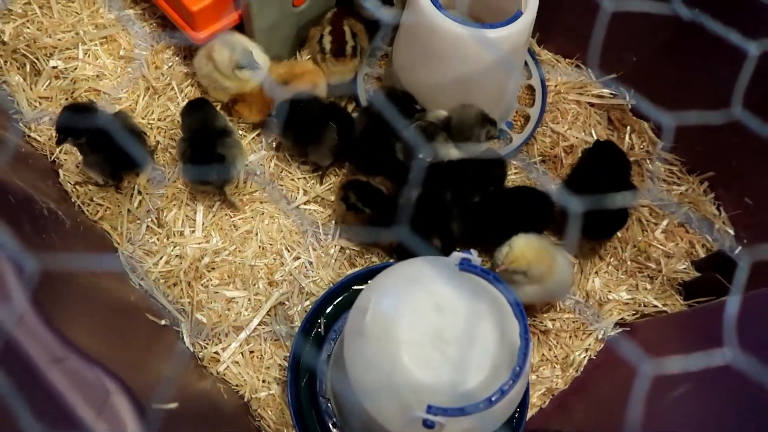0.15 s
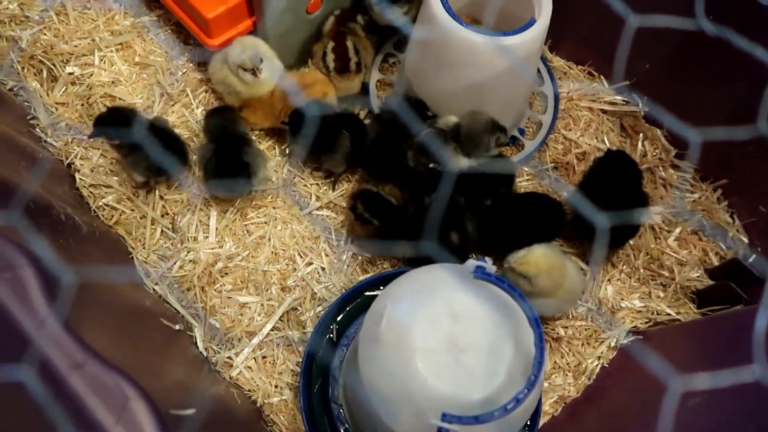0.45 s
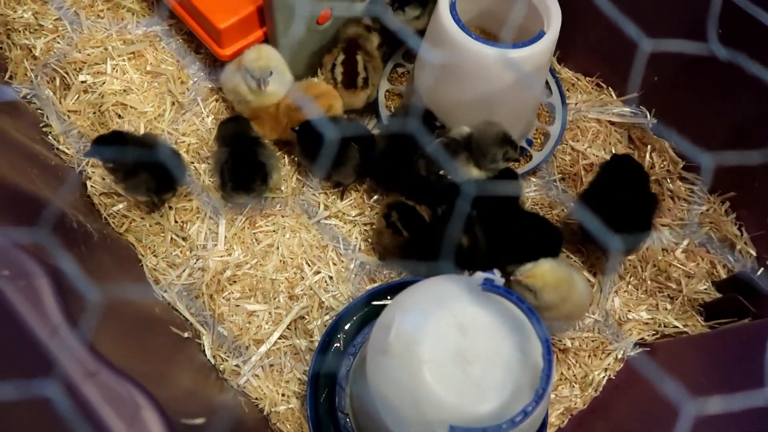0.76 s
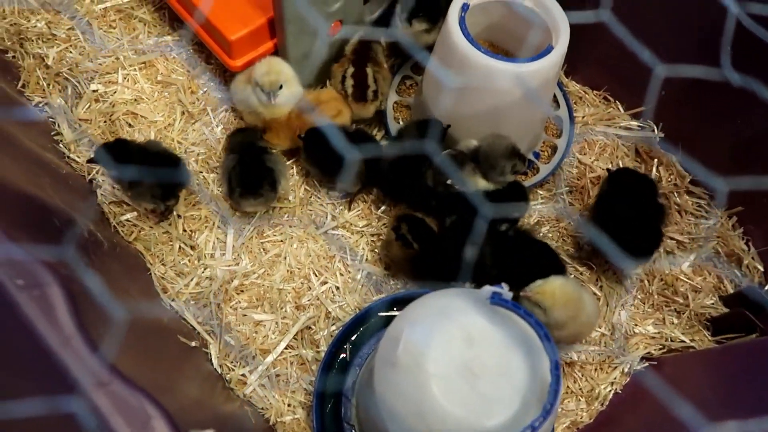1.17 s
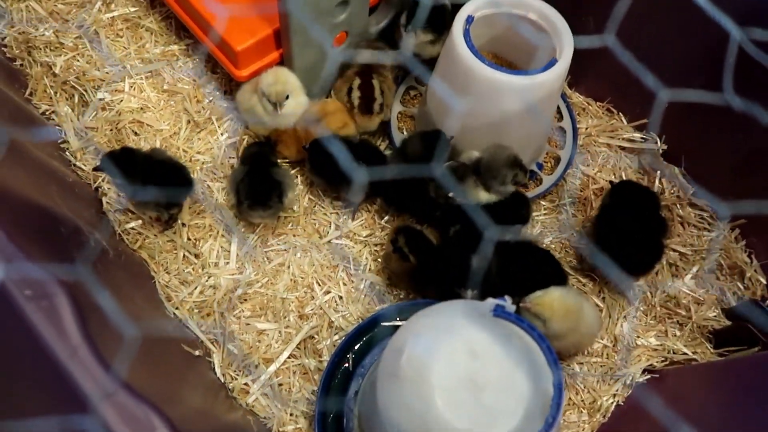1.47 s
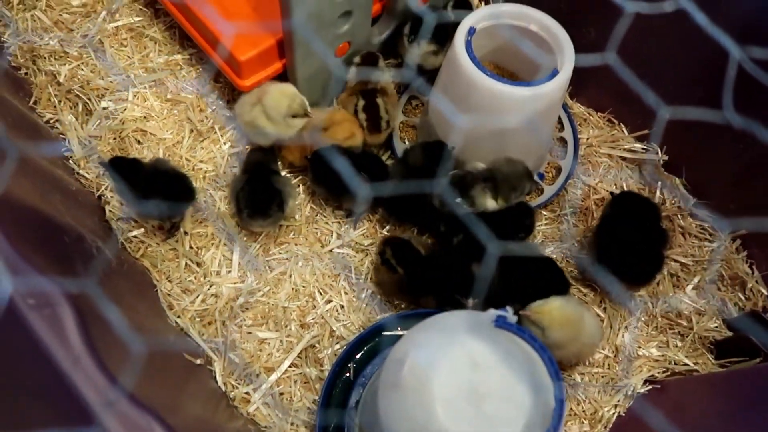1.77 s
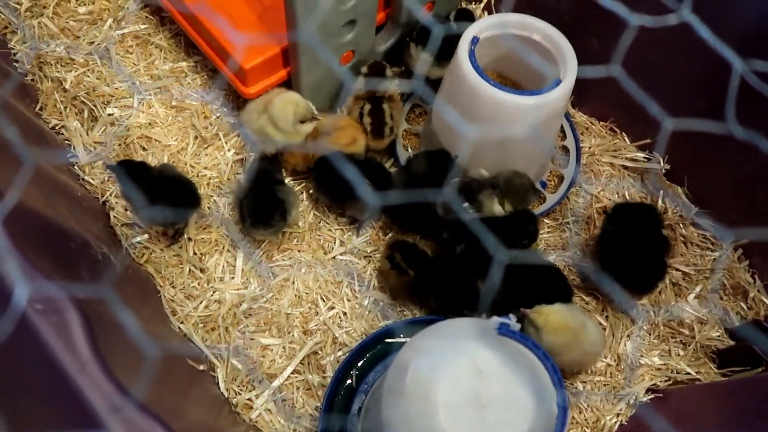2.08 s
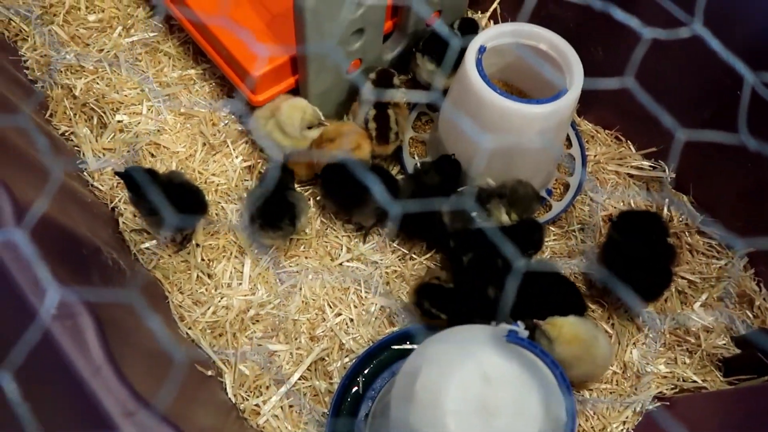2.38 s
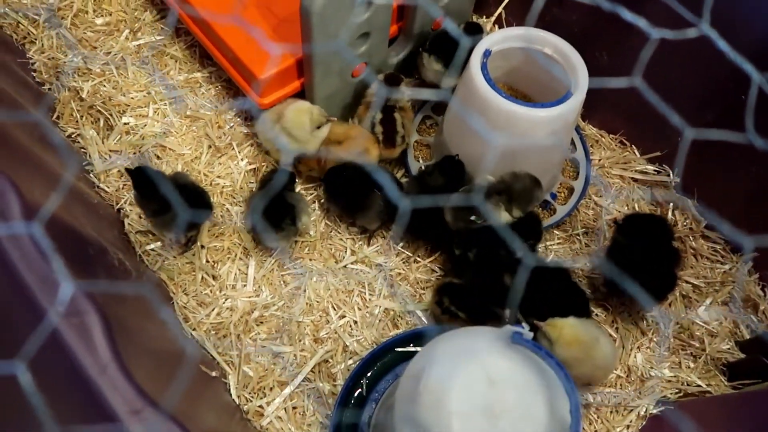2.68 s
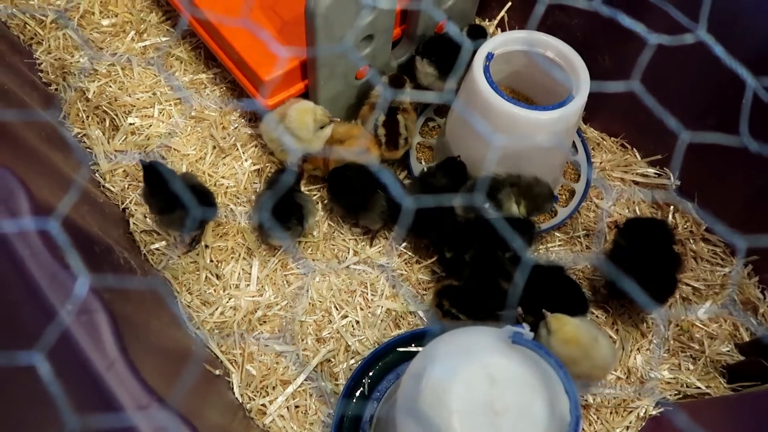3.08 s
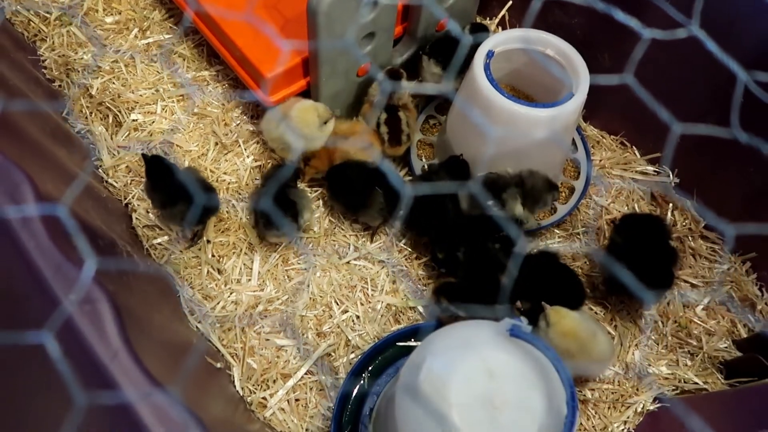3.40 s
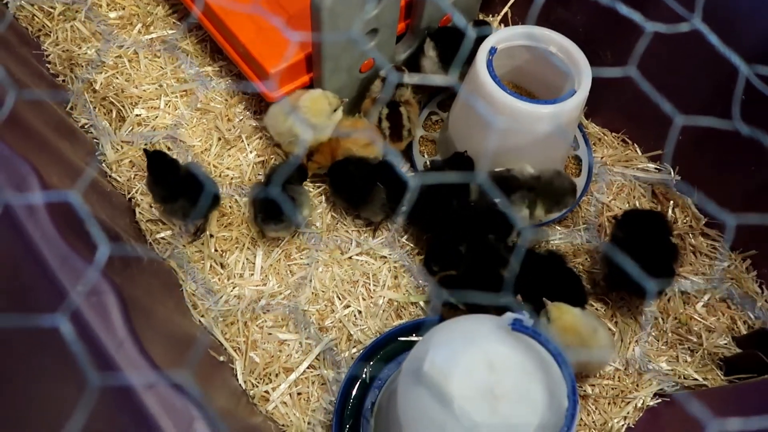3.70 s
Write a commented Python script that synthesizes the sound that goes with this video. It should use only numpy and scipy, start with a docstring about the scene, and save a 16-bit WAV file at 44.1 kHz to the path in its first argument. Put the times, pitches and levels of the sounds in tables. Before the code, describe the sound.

A group of baby chicks peeps throughout in overlapping, high, falling whistles, close to a phone microphone in a straw-lined indoor brooder, with a few light feeder taps and soft bumps later on.

```python
"""In a straw-lined brooder indoors, many chicks peep over each other an arm's length under a phone.
Each peep is a near-pure whistle that glides in pitch and level, with two faint overtones.
One chick splits its whistle with a second voice and a low tone; small chicks add short high arches.
The brooder floor echoes the peeps and the room rings after them. Beaks tap a plastic feeder,
as crack and ringing modes; filtered grit rubs, low sines bump, and noise bands and a hum lie beneath."""
import sys
import numpy as np
from scipy import signal
from scipy.io import wavfile
from scipy.ndimage import uniform_filter1d, map_coordinates

SR = 44100
rng = np.random.default_rng(int(sys.argv[2]) if len(sys.argv) > 2 else 0)


def convert_level_to_amplitude(level_db):
    """Map a level in decibels to its linear amplitude factor."""
    exponent = np.asarray(level_db, float) / 20
    return 10 ** exponent


def persist_wave(psi):
    """Save psi, clipped to +-1, as 16-bit WAV."""
    counts = np.round(np.clip(psi, -1, 1) * 32767).astype(np.int16)
    wavfile.write(sys.argv[1], SR, np.atleast_2d(counts).T)


N = 169785  # length in samples
FADE_S = 0.0066
# the two-voiced chick: its low tone, and the pitch above which its whistle is its voice plus that tone
LOW_HZ, LOW_DROP_HZ, LOW_S, SPLIT_HZ = 984, 366, 0.11, 4250


def band(x, hz, width_hz):
    """Resonance with gain 1 at the centre."""
    return signal.lfilter(*signal.iirpeak(hz, hz / width_hz, fs=SR), x)


def walk(rate_hz, size):
    """Smooth random drift around 0, rms about 0.7, from rate_hz fresh values a second."""
    k = int(SR / rate_hz)
    steps = np.repeat(rng.standard_normal(size // k + 1), k)
    return uniform_filter1d(uniform_filter1d(steps, k), k)[:size]


def add(out, start_s, x):
    """Mixes x into out from start_s."""
    i = max(int(start_s * SR), 0)
    out[..., i:i + x.shape[-1]] += x[..., :N - i]


def fades(t, fade_s):
    """Soft start and end."""
    to_edge = np.minimum(t - t[0], t[-1] - t)
    return np.sin(np.pi / 2 * np.clip(to_edge / fade_s, 0, 1)) ** 2


def sweep(hz):
    """Phase of a tone with a moving pitch."""
    return 2 * np.pi * np.cumsum(hz) / SR


# Chick whistles, one list of glide points per peep: time_s, pitch_hz, level_db (rms, before shimmer)
PEEP_GLIDES = [
    [(0.0, 3870, -35), (0.045, 3037, -26.5), (0.062, 2190, -40.5)],
    [(0.09, 5380, -58), (0.137, 4610, -39.5), (0.185, 4400, -27.5), (0.228, 2700, -23),
     (0.248, 2380, -32.5)],
    [(0.175, 4580, -35.5), (0.26, 4710, -29), (0.315, 4723, -24.5), (0.335, 4450, -12), (0.346, 3480, -23),
     (0.385, 2620, -31)],
    [(0.2, 4374, -29), (0.265, 4710, -26), (0.31, 4450, -23), (0.335, 4400, -18), (0.372, 4176, -26),
     (0.4, 3585, -21), (0.44, 2930, -24), (0.448, 2356, -24)],
    [(0.22, 3646, -17), (0.26, 3860, -31.5), (0.345, 3870, -16), (0.36, 3576, -16), (0.385, 3573, -15),
     (0.41, 3160, -14), (0.426, 2456, -36)],
    [(0.628, 2760, -48.5), (0.645, 2905, -42.5), (0.668, 4800, -58)],
    [(0.672, 4210, -35), (0.71, 4570, -31), (0.75, 4305, -18.5), (0.79, 4176, -14), (0.81, 3603, -12),
     (0.84, 3646, -13), (0.86, 3260, -19.5), (0.885, 2460, -36.5)],
    [(0.685, 3687, -20.5), (0.79, 3923, -25), (0.86, 2760, -32), (0.872, 2190, -45)],
    [(0.772, 4030, -46.5), (0.78, 2964, -19.5), (0.81, 3030, -23.5), (0.824, 2250, -34.5)],
    [(0.83, 4790, -40), (0.89, 4822, -28), (0.94, 4803, -21), (0.962, 4510, -23), (0.967, 3810, -20.5),
     (1.032, 2540, -39)],
    [(0.98, 4040, -22.5), (1.01, 4270, -30.5), (1.03, 3876, -19.5), (1.06, 3396, -19), (1.112, 2450, -37.5)],
    [(1.122, 4200, -37), (1.145, 4584, -35), (1.2, 4340, -17), (1.27, 3727, -14), (1.3, 2900, -18),
     (1.326, 2020, -56.5)],
    [(1.575, 4100, -32.5), (1.605, 4480, -35), (1.65, 4293, -15), (1.69, 4145, -19.5), (1.708, 3840, -10.5),
     (1.735, 3150, -13.5), (1.76, 2610, -33.5), (1.776, 2140, -51)],
    [(1.595, 4626, -39), (1.685, 4960, -25.5), (1.71, 4910, -19.5), (1.76, 4634, -24), (1.774, 4420, -22),
     (1.78, 4010, -22.5), (1.826, 2770, -33.5)],
    [(1.845, 5860, -54), (1.875, 5910, -46.5), (1.91, 5310, -36), (1.972, 2886, -34)],
    [(1.925, 2360, -50), (1.96, 2640, -46)],
    [(2.015, 3825, -48), (2.04, 4520, -31), (2.07, 4570, -27), (2.1, 4294, -19.5), (2.14, 4145, -22),
     (2.17, 3820, -8.5), (2.2, 2936, -18.5), (2.228, 2100, -48.5)],
    [(2.05, 3830, -50), (2.14, 2900, -41), (2.156, 3360, -43)],
    [(2.19, 4640, -51.5), (2.23, 4870, -27), (2.29, 4810, -23.5), (2.35, 4758, -16), (2.374, 4325, -17),
     (2.382, 3756, -19), (2.436, 2850, -32.5)],
    [(2.35, 4327, -44), (2.38, 3715, -22.5), (2.42, 2572, -54)],
    [(2.46, 3720, -40.5), (2.52, 3164, -31.5), (2.537, 2430, -47.5)],
    [(2.538, 4130, -29), (2.56, 4473, -23.5), (2.61, 4340, -17), (2.654, 4148, -13), (2.69, 3880, -12.5),
     (2.715, 3212, -10.5), (2.746, 2110, -45)],
    [(2.578, 3510, -38), (2.595, 4000, -37.5)],
    [(2.83, 5850, -56.5), (2.885, 5720, -35.5), (2.93, 4240, -29.5)],
    [(2.785, 3980, -29), (2.812, 3056, -28), (2.845, 2900, -26.5), (2.857, 2180, -49)],
    [(2.78, 4734, -40), (2.89, 4947, -24.5), (2.94, 4768, -12.5), (2.961, 4550, -18), (2.966, 3870, -18),
     (3.023, 2860, -24.5)],
    [(2.91, 4040, -35), (2.945, 3840, -29), (2.97, 2744, -27.5)],
    [(2.967, 4540, -28), (3.0, 4594, -18.5), (3.085, 4167, -10.5), (3.097, 3980, -12.5),
     (3.105, 3205, -13.5), (3.135, 2840, -26.5), (3.153, 2170, -43.5)],
    [(3.27, 5110, -43.5), (3.345, 5720, -45), (3.395, 5305, -37.5), (3.42, 4340, -20), (3.458, 2735, -28.5)],
    [(3.3, 4370, -45.5), (3.338, 3570, -30), (3.355, 2913, -28.5), (3.375, 3000, -28.5),
     (3.386, 2340, -36.5)],
    [(3.415, 4750, -48), (3.495, 4802, -24), (3.55, 4845, -15), (3.594, 4460, -15), (3.6, 3820, -18),
     (3.652, 2833, -24.5)],
    [(3.5, 2575, -41.5), (3.528, 2634, -40.5), (3.545, 3960, -42.5)],
    [(3.62, 4356, -34), (3.66, 4335, -19), (3.71, 3950, -13), (3.725, 3410, -15.5), (3.735, 3090, -12),
     (3.76, 2800, -32.5), (3.791, 2264, -27)],
    [(3.83, 4160, -35), (3.849, 3590, -18)],
]


def peeps():
    """Gliding whistles; pitch and level tremble, and each peep has its own lag between the ports."""
    smooth_s = 0.0063
    shimmer_depth_db, waver_share = 2.4, 0.004  # per unit of drift
    port_shift_s = 25e-6  # furthest a port hears a peep early or late
    out = np.zeros((2, N))
    drifts = [walk(rate_hz, 2 * N) for rate_hz in (120, 90, 70, 50)]
    for rows, (turn, place, side) in zip(PEEP_GLIDES, rng.random((len(PEEP_GLIDES), 3))):
        time_s, pitch_hz, level_db = np.array(rows, float).T
        t = np.arange(time_s[0] - FADE_S / 2, time_s[-1] + FADE_S / 2, 1 / SR)
        waver, shimmer, *scatter = (d[int(place * N):][:len(t)] for d in drifts)
        shimmer_db = shimmer_depth_db * shimmer

        def glide(values):
            return uniform_filter1d(np.interp(t, time_s, values), int(smooth_s * SR) + 1, mode="nearest")

        pitch = glide(pitch_hz) * (1 + waver_share * waver)
        shift = 2 * np.pi * port_shift_s * (2 * side - 1) * pitch * np.array([[1], [-1]])
        phase = sweep(pitch) + 2 * np.pi * turn + shift
        low_hz = low_pitch(t, time_s, pitch_hz, pitch)
        if low_hz.any():
            add_second_voices(out, t, time_s, pitch_hz, phase, shimmer_db)
        level = np.sqrt(2) * convert_level_to_amplitude(glide(level_db) + shimmer_db)
        add(out, t[0], level * fades(t, FADE_S) * whistle(phase, pitch, low_hz, scatter, time_s[0]))
    return out


# Overtones of a whistle: level_db (under the whistle, voice at 4 kHz), slope_db_per_octave (of voice pitch)
OVERTONE_COLOUR = [(-35, -36), (-38, 10)]


def whistle(phase, pitch, low_hz, scatter, start_s):
    """A sine with overtones spaced by the voice's own pitch, which is the whistle less any low tone."""
    shrill_starts_s, shrill_db = (0.22, 0.685), 9  # peeps of a chick with a shriller voice
    scatter_db = 5  # per unit of drift
    is_shrill = np.min(np.abs(start_s - np.array(shrill_starts_s))) < FADE_S
    voice_hz = pitch - low_hz
    voice_phase = phase - sweep(low_hz)
    sound = np.sin(phase)
    for k, (level_db, slope_db) in enumerate(OVERTONE_COLOUR):
        colour_db = level_db + slope_db * np.log2(voice_hz / 4000)
        colour_db = colour_db + shrill_db * is_shrill + scatter_db * scatter[k]
        sound += convert_level_to_amplitude(colour_db) * np.sin(phase + (k + 1) * voice_phase)
    return sound


# Second voices of the two-voiced chick: start_s, joins_s, gap_hz (at the start), level_db (rms, before shimmer)
SECOND_VOICES = [(0.837, .895, 390, -31.5), (1.617, 1.696, 344, -27), (2.208, 2.29, 438, -28.5),
                 (2.788, 2.889, 420, -28), (3.415, 3.509, 377, -29.5)]
LOW_STARTS_S = [row[1] - .028 for row in SECOND_VOICES]  # the low tone starts just before the voices join


def add_second_voices(out, t, time_s, pitch_hz, phase, shimmer_db):
    """A voice below the whistle climbs into it, with sidebands one and two gaps above the whistle."""
    bend = 1.6  # above 1 the gap closes late
    sidebands_db = (-16, -28.5)  # under the second voice
    for start_s, joins_s, gap_hz, level_db in SECOND_VOICES:
        start_hz = np.interp(start_s, time_s, pitch_hz) - gap_hz
        if not (time_s[0] < joins_s < time_s[-1] and start_hz > SPLIT_HZ - LOW_DROP_HZ / 2):
            continue
        on = (t > start_s) & (t < joins_s)
        gap = sweep(gap_hz * (1 - np.linspace(0, 1, on.sum()) ** bend))
        main = phase[:, on]
        voice = np.sin(main - gap)
        for k, side_db in enumerate(sidebands_db):
            voice += convert_level_to_amplitude(side_db) * np.sin(main + (k + 1) * gap)
        level = np.sqrt(2) * convert_level_to_amplitude(level_db + shimmer_db[on])
        add(out, t[on][0], level * fades(t[on], 2 * FADE_S) * voice)


def low_pitch(t, time_s, pitch_hz, pitch):
    """Pitch of the low tone inside a high enough whistle, zero where there is none."""
    low_hz = np.zeros(len(t))
    for start_s in LOW_STARTS_S:
        inside = time_s[0] < start_s < time_s[-1] - LOW_S
        if inside and np.interp(start_s + LOW_S / 2, time_s, pitch_hz) > SPLIT_HZ + LOW_HZ / 2:
            fall = np.clip((t - start_s) / LOW_S, 0, 1) ** 3
            low_hz = (LOW_HZ - LOW_DROP_HZ * fall) * (pitch > SPLIT_HZ)
    return low_hz


def low_tones():
    """The faint low tone under the two-voiced whistle: a sine that falls ever faster."""
    out, t = np.zeros(N), np.arange(0, LOW_S, 1 / SR)
    tone = fades(t, 0.011) * np.sin(sweep(LOW_HZ - LOW_DROP_HZ * (t / LOW_S) ** 3))
    for start_s in LOW_STARTS_S:
        add(out, start_s, convert_level_to_amplitude(-55.5) * tone)
    return out


# A small chick's short high arches: top_s (time of the highest pitch), level_db (peak), rise_s
HIGH_ARCHES = [(1.461, -48.5, 0.061), (2.058, -46, 0.014), (2.316, -46, 0.04), (2.786, -44.5, 0.048)]


def arches():
    """Sines whose pitch rises to a top and bends down again as a parabola."""
    top_hz, sag_hz_per_s2, fall_s = 5740, 960000, 0.012
    out = np.zeros(N)
    for top_s, level_db, rise_s in HIGH_ARCHES:
        t = np.arange(-rise_s, fall_s, 1 / SR)
        tone = np.sin(sweep(top_hz - sag_hz_per_s2 * t ** 2))
        add(out, top_s - rise_s, convert_level_to_amplitude(level_db) * fades(t, FADE_S) * tone)
    return out


def early_echoes(birds):
    """Floor and wall each return the chicks once per port, a few milliseconds late."""
    def delayed(delays_s):
        return np.array([map_coordinates(b, [np.arange(N) - s * SR]) for b, s in zip(birds, delays_s)])

    floor = delayed((0.00257, 0.00260))  # left, right
    wall = delayed((0.011, 0.0071))
    return convert_level_to_amplitude(-8.5) * (floor + wall)


# Beak taps: start_s, level_db (scales ring and crack together)
BEAK_TAPS = [(0.825, -35.5), (1.5726, -30), (3.2532, -33)]
# Ringing modes of the plastic feeder: mode_hz, level_db (relative), t60_s
FEEDER_MODES = [(428, -1.5, 0.24), (573, -6, 0.11), (1380, 4.5, 0.027), (2900, 3, 0.063)]


def taps():
    """A short noise crack at each strike, and the decaying modes of the feeder."""
    crack_db, crack_s = 8, 0.004  # against the ring; decay constant
    out, t = np.zeros(N), np.arange(SR // 2) / SR
    ring = sum(convert_level_to_amplitude(db) * np.sin(2 * np.pi * hz * t) * 1000. ** (-t / t60_s) for hz, db, t60_s in FEEDER_MODES)
    for start_s, level_db in BEAK_TAPS:
        noise = signal.lfilter([.5], [1, -.75], rng.standard_normal(len(t)))
        crack = noise * np.exp(-t / crack_s)
        add(out, start_s, convert_level_to_amplitude(level_db) * (ring + convert_level_to_amplitude(crack_db) * crack))
    return out


# Rubbing: start_s, length_s, level_db (rms of the lower resonance), upper_hz (upper resonance)
RUBBING = [(1.095, 0.1, -48.5, 1220), (1.323, 0.144, -46, 1420)]


def rubs():
    """Grainy noise strokes through a low and a weaker high resonance."""
    lower_hz, upper_db = 337, -12
    out, grit = np.zeros(N), rng.standard_normal(SR)
    for start_s, length_s, level_db, upper_hz in RUBBING:
        t = np.arange(0, length_s, 1 / SR)
        stroke = grit[int(start_s * SR / 2):][:len(t)] * fades(t, 0.034)
        stroke = np.pad(stroke, (0, SR // 10))  # room to ring out
        low = band(band(stroke, lower_hz, 90), lower_hz, 90)
        high = band(band(stroke, upper_hz, 280), upper_hz, 280)
        add(out, start_s, convert_level_to_amplitude(level_db) * (low / low.std() + convert_level_to_amplitude(upper_db) * high / high.std()))
    return out


# Dull bumps: start_s, level_db (roughly the peak), pitch_hz
DULL_BUMPS = [(2.612, -25.5, 46.7), (2.693, -23, 163), (2.763, -30, 152), (2.804, -24, 161), (3.3, -34, 40),
              (3.343, -33, 290), (3.541, -32, 183.6)]


def bumps():
    """Soft low sines that swell and die within a few cycles."""
    cycles = 5  # per unit of envelope time
    out = np.zeros(N)
    for start_s, level_db, pitch_hz in DULL_BUMPS:
        u = np.arange(SR // 2) / SR * pitch_hz / cycles
        swell = 10 * u * np.exp(-5 * u)
        add(out, start_s, convert_level_to_amplitude(level_db) * swell * np.sin(2 * np.pi * cycles * u))
    return out


def room_tail(source):
    """Reverberation: the source convolved with decaying noise, partly alike in both ports."""
    t60_s, level_db, alike, top_hz = 0.4, -18, 0.65, 6000
    t = np.arange(SR) / SR
    shared, separate = rng.standard_normal(SR), rng.standard_normal((2, SR))
    tail = alike * shared + (1 - alike) * separate
    tail = tail * 1000. ** (-t / t60_s) * np.clip(t / 0.0055, 0, 1)
    tail = signal.lfilter(*signal.butter(2, top_hz, fs=SR), tail)
    tail *= convert_level_to_amplitude(level_db) / np.sqrt(np.sum(tail ** 2) / 2)
    return signal.fftconvolve(source[None], tail, axes=1)[:, :N]


# Spectrum of the room noise: centre_hz, density_db (relative, per Hz)
NOISE_SPECTRUM = [(25, -7), (65, 4.5), (300, -5), (2000, -23), (3500, -7), (6000, -43.5), (9000, -58)]


def room_noise():
    """Half-octave noise bands that flicker, alike in the bass, and a hum wavering in pitch and level."""
    noise_db, hum_hz, hum_db = -46.5, 60.5, -53
    noise, (centre_hz, density_db) = 0, np.array(NOISE_SPECTRUM).T
    for hz in 28 * 2 ** np.arange(0, 8.6, .5):
        mid, side = (band(band(rng.standard_normal(N), hz, hz / 2), hz, hz / 2) for _ in range(2))
        level_db = np.interp(np.log(hz), np.log(centre_hz), density_db) + 2.5 * walk(7, N)
        width = min(hz / 1200, .8)
        noise = noise + convert_level_to_amplitude(level_db) * (mid + width * side * np.array([[1], [-1]]))
    hum = np.sin(sweep(hum_hz * (1 + .05 * walk(8, N)))) * convert_level_to_amplitude(hum_db + 4 * walk(12, N))
    return noise * convert_level_to_amplitude(noise_db) / np.std(noise) + hum


def scene():
    """Chicks with early echoes, feeder taps, the room tail of both, handling and room noise."""
    birds = peeps() + arches() + low_tones()
    feeder = taps()
    room = room_tail(birds.mean(axis=0) + feeder)
    return birds + early_echoes(birds) + feeder + room + rubs() + bumps() + room_noise()


def top_cut(x):
    """Nothing passes above the cut-off."""
    return signal.sosfilt(signal.butter(12, 15700, fs=SR, output="sos"), x)


def record(dry):
    """The phone's microphone dulls the top with a low-pass."""
    dull = signal.lfilter(*signal.butter(2, 11800, fs=SR), dry)
    return top_cut(dull)


dry = scene()
out = record(dry)
persist_wave(out)
```